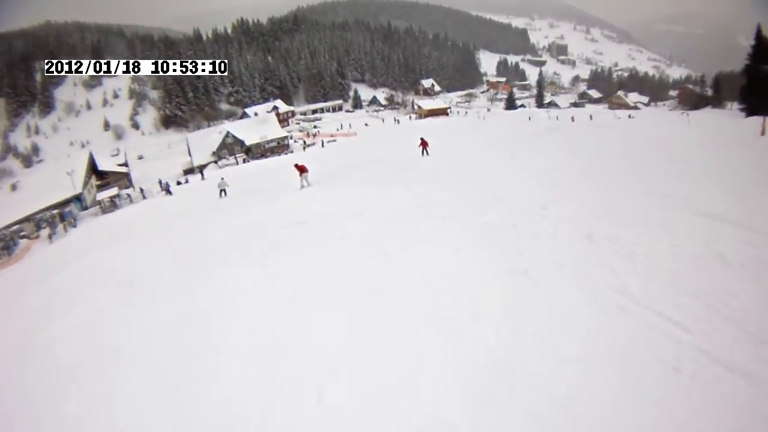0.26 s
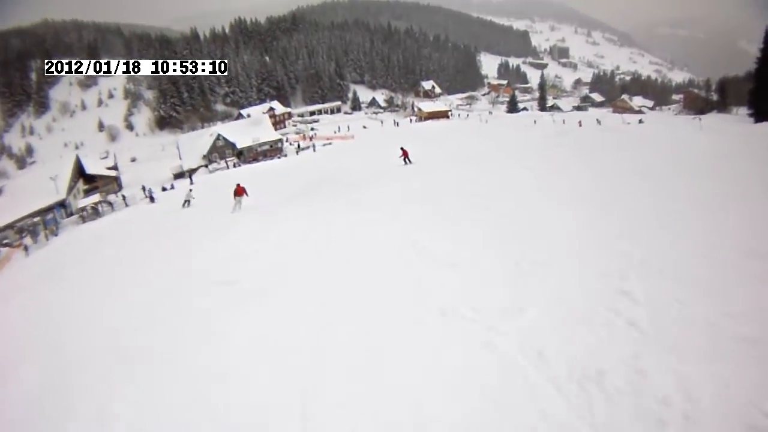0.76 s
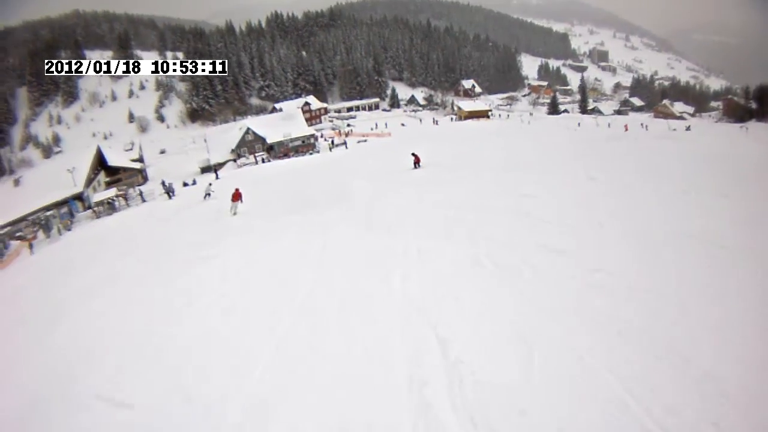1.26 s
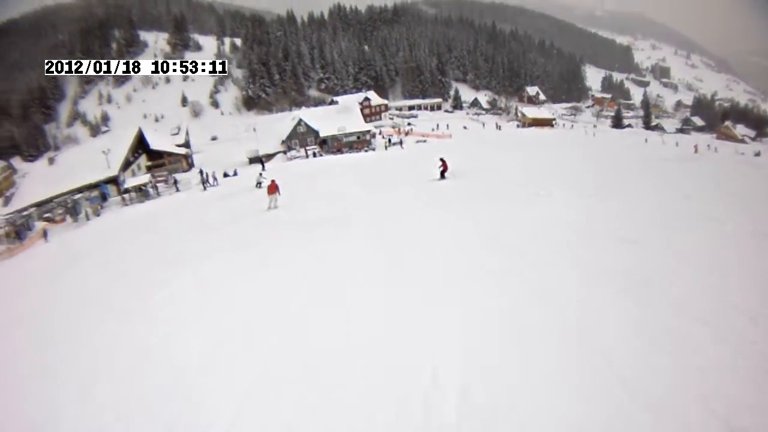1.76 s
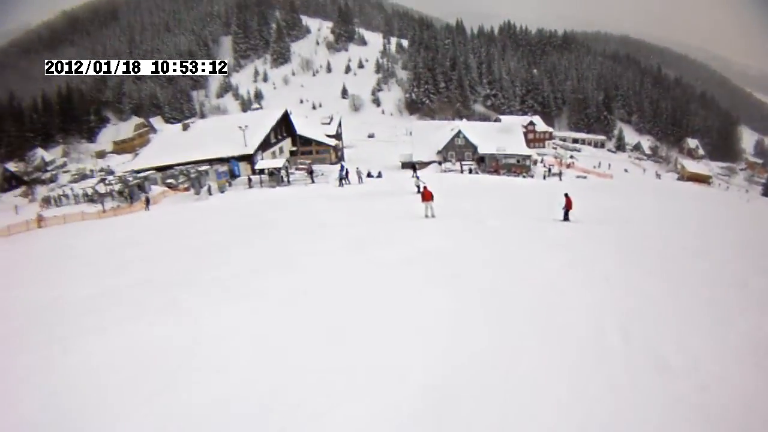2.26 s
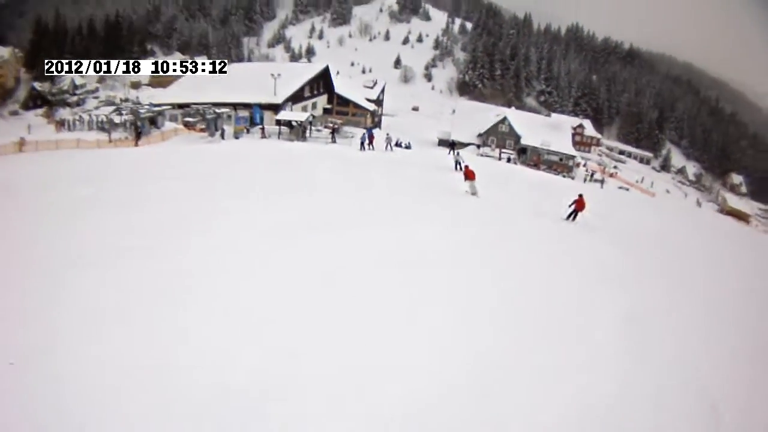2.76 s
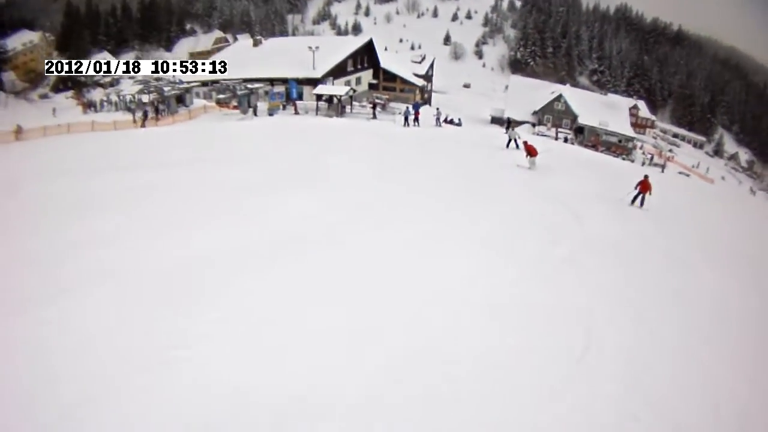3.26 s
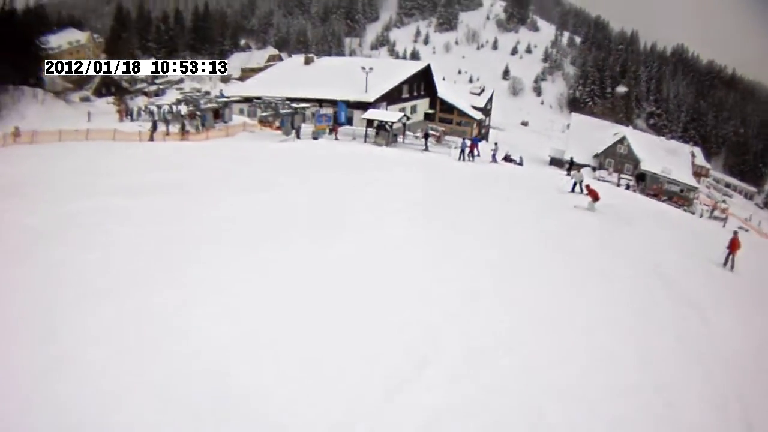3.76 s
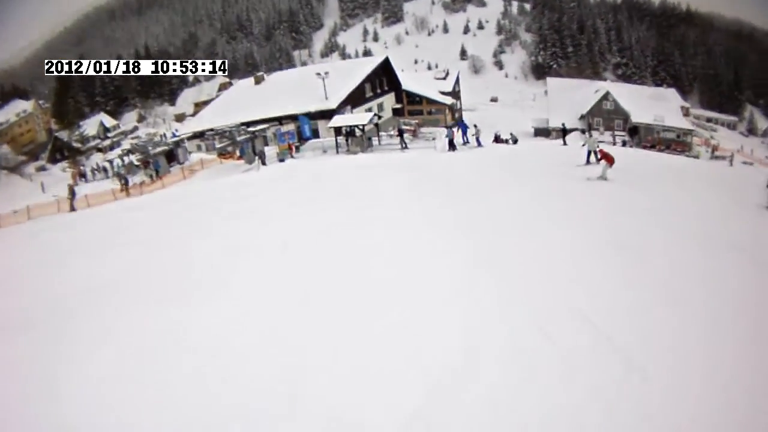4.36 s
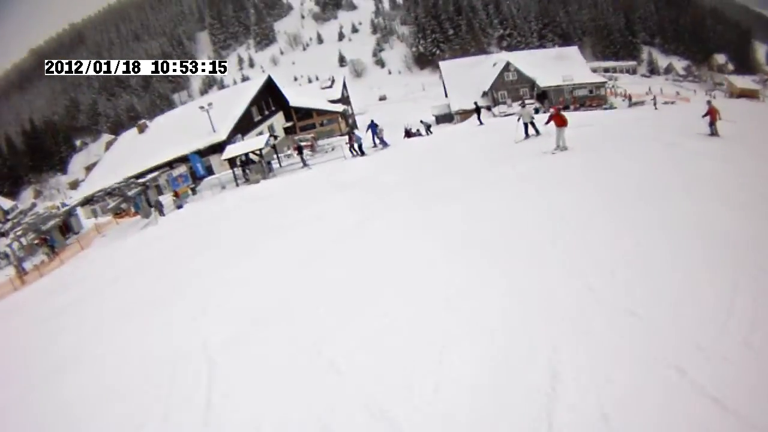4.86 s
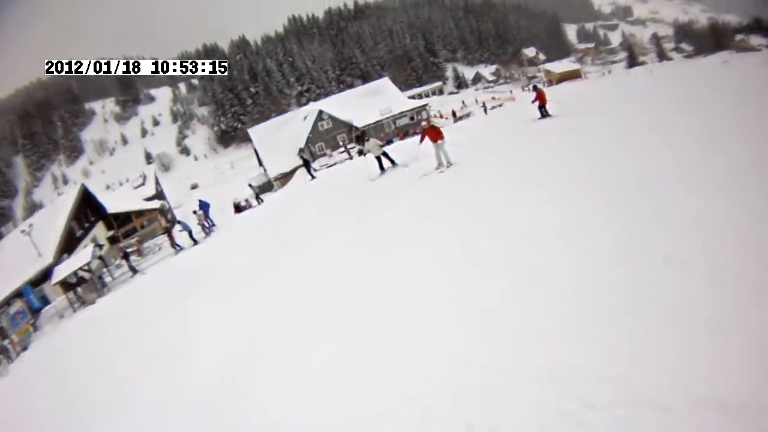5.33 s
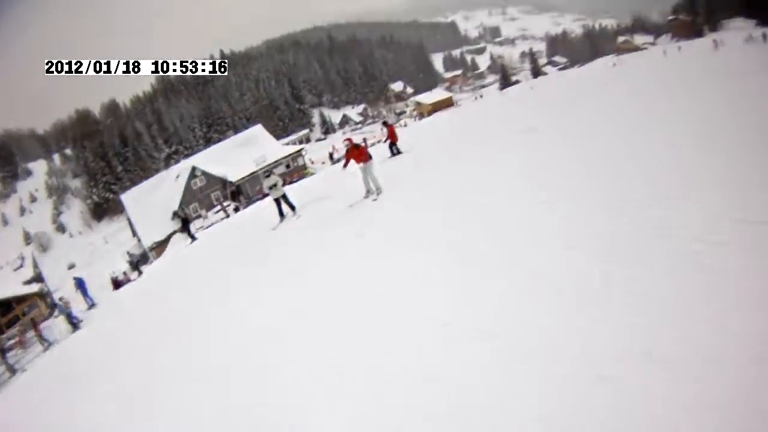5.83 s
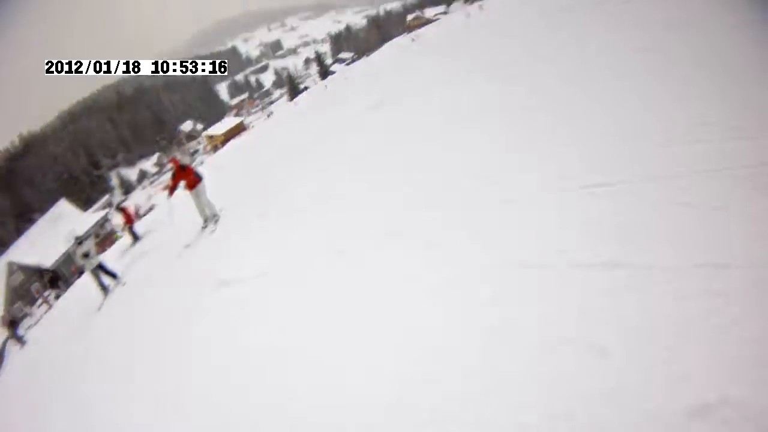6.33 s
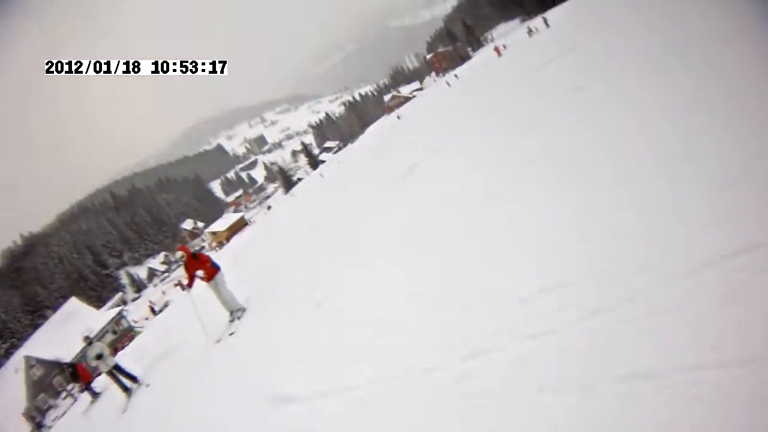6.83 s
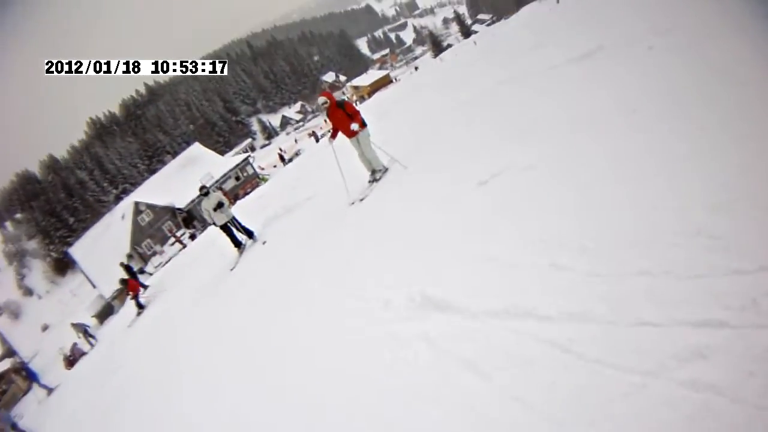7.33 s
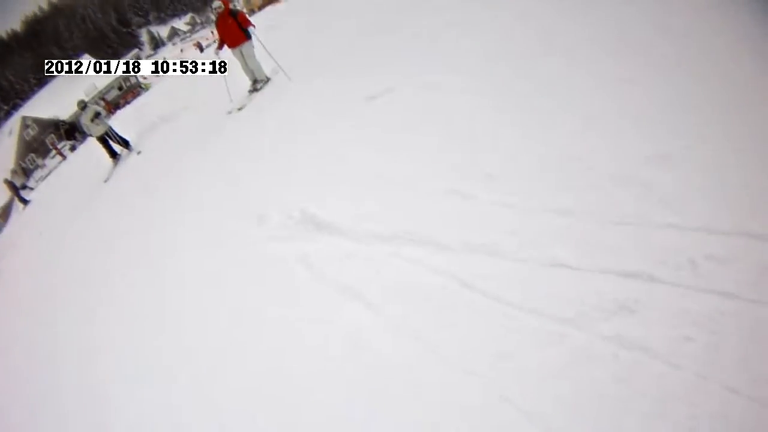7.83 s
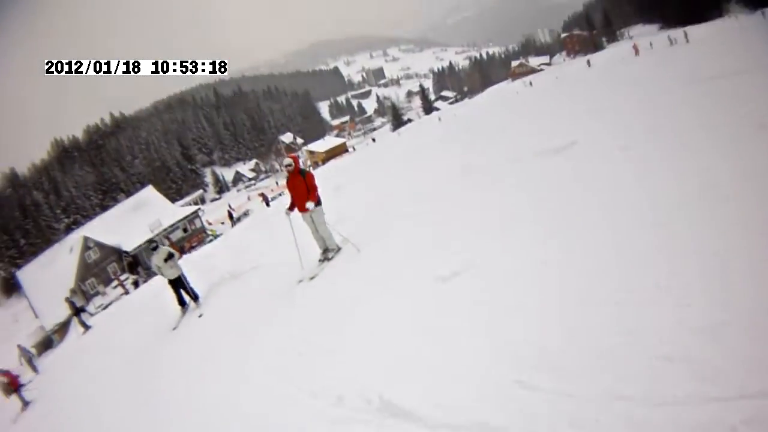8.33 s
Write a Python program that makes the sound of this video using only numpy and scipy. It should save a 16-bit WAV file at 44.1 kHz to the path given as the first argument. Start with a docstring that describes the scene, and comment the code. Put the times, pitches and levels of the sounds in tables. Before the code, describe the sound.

On an open snowy slope, heard from a small camera worn by the skier, steel edges scrape crust in a loud, bright, uneven rasp with brief dropouts and ice ticks. After three seconds it thins to a grainy crunch over a low rush. From five seconds the skis hiss softly, gear knocks lightly, a ringing skid passes, and it fades to quiet air.

```python
"""On a packed-snow slope, heard through a small camera worn by the skier, skis at body distance.
First the steel edges scrape the crust in a dense stream of breaking grains, with a ringing ski,
ice crumbs ticking on the camera case and wind noise at the microphone. The grains thin to a crunch,
over the low rush of a braking turn. From about 5 s the bases hiss softly over the snow; light gear
knocks, a ringing sideways skid and a few short brushes follow as the skier comes to a stop."""
import sys
import numpy as np
from scipy import signal
from scipy.fft import rfft, irfft
from scipy.io import wavfile

SR = 44100
rng = np.random.default_rng(int(sys.argv[2]) if len(sys.argv) > 2 else 0)


def persist_wave(psi):
    """Save psi, clipped to +-1, as 16-bit WAV."""
    counts = np.round(np.clip(psi, -1, 1) * 32767).astype(np.int16)
    wavfile.write(sys.argv[1], SR, np.atleast_2d(counts).T)


N = 378819
TIME = np.arange(N) / SR   # s


def from_db(db):
    """Decibels to amplitude gain."""
    return 10 ** (np.asarray(db) / 20)


def rms_one(x):
    """Scale to unit power."""
    return x / np.sqrt(np.mean(x ** 2) + 1e-20)


def in_time(rows):
    """Each column of a curve, interpolated at every sample."""
    s, *columns = np.transpose(rows)
    return [np.interp(TIME, s, c) for c in columns]


def drift(rate_hz):
    """Slow chance with spread 1: noise twice through a one-pole low-pass."""
    step, settle = 40, 2000   # samples per slow step; slow steps dropped while the filter settles
    r = np.exp(-2 * np.pi * rate_hz * step / SR)
    noise = rng.standard_normal(N // step + settle + 2)
    slow = signal.lfilter([1], [1, -2 * r, r * r], noise)[settle:]
    return np.interp(np.arange(N) / step, np.arange(len(slow)), rms_one(slow))


def band(x, low_hz, high_hz, order=2):
    """Butterworth band-pass."""
    edges_hz = [low_hz, min(high_hz, SR / 2 - 1)]
    return signal.sosfilt(signal.butter(order, edges_hz, "band", fs=SR, output="sos"), x)


def below(x, hz, order):
    """Butterworth low-pass run both ways, so that x minus the result is the treble."""
    return signal.sosfiltfilt(signal.butter(order, hz, fs=SR, output="sos"), x)


def resonate(x, hz, width_hz):
    """A two-pole resonance with gain 1 on top."""
    r = np.exp(-np.pi * width_hz / SR)
    zeros = np.array([1, 0, -1]) * (1 - r * r) / 2
    poles = [1, -2 * r * np.cos(2 * np.pi * hz / SR), r * r]
    return signal.lfilter(zeros, poles, x + 1e-18)


def colour(x, spectrum, size=2048):
    """Causal (minimum-phase) filter with the given spectrum, made by folding its cepstrum."""
    hz, db = np.transpose(spectrum)
    grid_hz = np.maximum(np.arange(size // 2 + 1) * SR / size, 1)
    gain = from_db(np.interp(np.log(grid_hz), np.log(hz), db))
    cepstrum = irfft(np.log(gain))
    cepstrum[1:size // 2] *= 2
    cepstrum[size // 2 + 1:] = 0
    impulse = irfft(np.exp(rfft(cepstrum)))
    return signal.fftconvolve(x, impulse)[:len(x)]


def grains(per_s, spread_db):
    """Snow grains breaking at random moments with uneven sizes; unit power at any rate."""
    chance = np.clip(per_s / SR, 1e-4, 1)   # of a grain at each sample
    sizes_db = spread_db * np.clip(rng.standard_normal(N), -2, 2)
    sizes = from_db(sizes_db) * rng.choice([-1, 1], N)
    return rms_one((rng.random(N) < chance) * sizes / np.sqrt(chance))


def bursts(events, shape, decay_s, size=4096):
    """Each event is a dying puff of noise, coloured by shape and set to its peak level."""
    out, age_s = np.zeros(N + size), np.arange(size) / SR
    for s, db in events:
        puff = shape(rng.standard_normal(size) * np.exp(-age_s / decay_s))
        start = round(s * SR)
        out[start:start + size] += from_db(db) * puff / np.abs(puff).max()
    return out[:N]


def swell(s, length_s, attack_s, release_s):
    """Rises from 0 to 1 at s, holds, and falls back once its length is over."""
    rise = np.clip((TIME - s) / attack_s, 0, 1)
    fall = np.clip(1 - (TIME - s - length_s) / release_s, 0, 1)
    return rise * fall


def with_swells(steady_db, events, attack_s, release_s):
    """Two steady levels in dB, with the power of each event added to them."""
    power = from_db(steady_db) ** 2
    for s, length_s, *db in events:
        power = power + (from_db(db)[:, None] * swell(s, length_s, attack_s, release_s)) ** 2
    return 10 * np.log10(power)


# how hard the edges bite as the run slows, before the eases: t/s, level/dB
BITE = [(0.0, -18), (0.75, -16.5), (1.15, -17.5), (1.4, -16), (1.98, -16), (2.05, -21), (2.55, -16),
        (2.7, -19), (2.93, -16), (3.1, -21.5), (3.3, -22), (3.7, -27), (4.55, -28), (4.72, -24),
        (4.95, -28.5), (4.99, -38), (5.6, -41.5)]
# the skis go light over a bump or between turns: t/s, length/s, loss of bite/dB
EASES = [(0.194, 0.29, 5.5), (0.619, 0.033, 5.5), (0.844, 0.043, 5), (0.937, 0.071, 3.5),
         (1.147, 0.0824, 2), (1.64, 0.077, 3), (2.07, 0.012, 12.5), (2.208, 0.17, 4.5),
         (2.293, 0.021, 10.5), (2.33, 0.022, 6.5), (2.36, 0.16, 3), (2.552, 0.066, 7.5), (3.307, 0.12, 6),
         (3.773, 0.175, 6), (4.018, 0.113, 13.5), (4.13, 0.061, 5), (5.166, 0.1, 8.5), (5.36, 0.036, 14.5),
         (5.415, 0.072, 14), (5.52, 0.038, 11)]


def edge_bite():
    """The bite in dB: it follows the run and drops whenever the skis go light."""
    bite_db, = in_time(BITE)
    for s, length_s, loss_db in EASES:
        # the edge lets go slowly and catches quickly
        bite_db = bite_db - loss_db * swell(s, length_s, attack_s=0.026, release_s=0.014)
    return bite_db


# colour of breaking crust: f/Hz, relative level per Hz/dB
SCRAPE_COLOUR = [(100, -34), (470, -34.5), (700, -27), (920, -18), (1900, -11.5), (2600, -3.5), (3300, 2.5),
                 (4300, -3.5), (4900, 0), (5500, -10), (6150, -28), (7600, -40), (10800, -50), (11600, -78)]


def scrape(bite_db):
    """The harder the edges bite, the more grains break each second and the brighter they sound."""
    slack_db = np.clip(-15.5 - bite_db, 0, 30)
    per_s = 8000 * from_db(-.48 * slack_db)
    chatter_db = (0.8 + 0.06 * slack_db) * drift(130)   # the skis judder over fine ridges
    crust = rms_one(grains(per_s, spread_db=6.0) + 0.31 * rng.standard_normal(N))
    sound = colour(crust, SCRAPE_COLOUR)
    case = 0.13 * resonate(sound, 3280, 130) + 0.42 * resonate(sound, 4900, 220)
    case = case + 0.78 * resonate(sound, 240, 60)
    sound = rms_one(sound + case)
    dull = below(sound, 3900, order=3)
    treble = sound - dull
    icy_db = 0.8 * drift(40) + 1.43 - 0.31 * slack_db   # icy patches tip the balance to the treble
    sound = from_db(-.5 * icy_db) * dull + from_db(2.3 * icy_db) * treble
    lift_off = np.interp(TIME, [5.52, 5.64], [1, 0])   # the edges let go as the skis run flat
    return lift_off * from_db(bite_db + chatter_db) * sound


# a ski singing along with its edge: t/s, level/dB before the ring fades out
SKI_RING = [(0.0, -49), (1.0, -48.5), (1.5, -43), (1.95, -49.5), (2.17, -39.5), (2.4, -47), (2.9, -45),
            (3.85, -51.5)]


def ski_ring():
    """Friction keeps one mode of the ski ringing while the speed is high."""
    level_db, = in_time(SKI_RING)
    fast = np.interp(TIME, [3.8, 4.1], [1, 0])
    friction = band(rng.standard_normal(N), 720, 1400)
    return fast * from_db(level_db) * rms_one(resonate(friction, 1020, 75))


def plough():
    """Loose snow pushed aside in the braking turn gives a low rush."""
    push = np.interp(TIME, [3.2, 4.1, 4.2, 4.9, 5.05], [0.56, 0.59, 0.68, 0.81, 0.02])
    rush = band(rng.standard_normal(N), 572, 2200, order=7)
    return push * from_db(-46.5) * rms_one(rush + 0.24 * resonate(rush, 620, 140))


# bases gliding on loose snow, before trims: t/s, low rush level/dB, bright hiss level/dB
GLIDE = [(5.65, -51.5, -48), (5.8, -54, -52.5), (6.02, -52.5, -49.5), (6.2, -57.5, -55.5),
         (6.52, -57.5, -52), (6.85, -55, -41.5), (7.08, -61, -49.5), (7.24, -59, -51), (7.44, -71, -68.5),
         (8.59, -74.5, -79)]
# short brushes of a ski shifting on the snow, before trims:
# t/s, length/s, low rush level/dB, bright hiss level/dB
BRUSHES = [(6.587, 0.018, -53, -41.5), (7.122, 0.056, -60, -47), (7.631, 0.15, -64, -74),
           (7.852, 0.26, -70, -64), (8.166, 0.07, -66.5, -82), (8.435, 0.083, -64.5, -60.5)]
# colour of the gliding snow: f/Hz, relative level per Hz/dB
GLIDE_COLOUR = [(150, -11), (300, -10), (500, -9.5), (1000, -0.5), (1500, -0.5), (2000, -6), (3400, 3.5),
                (4200, -0.5), (5200, 6), (6200, -7.5), (7200, -10), (8500, -19), (10800, -18), (11600, -43)]
# resonances of the camera case: f/Hz, width/Hz, mean lift/dB
CASE = [(1630, 180, 5.5), (2680, 110, 8.5), (3220, 220, 5), (5130, 390, 0), (7900, 130, -6)]


def glide():
    """Finely grained friction of the bases gives a soft rush and hiss, coloured by the case."""
    rush_db, hiss_db = with_swells(in_time(GLIDE), BRUSHES, attack_s=0.01, release_s=0.061)
    per_s = 9000 * from_db(2.7 * drift(15))
    bare = colour(grains(per_s, spread_db=6.0), GLIDE_COLOUR)
    snow = bare
    for hz, width_hz, lift_db in CASE:
        lift = from_db(lift_db + 2.2 * drift(10.0)) - 1
        snow = snow + lift * resonate(bare, hz, width_hz)
    rush = below(snow, 2050, order=4)
    hiss = snow - rush
    flat = np.interp(TIME, [5.52, 5.62], [.3, 1])   # share of the treble that comes from the flat bases
    # each level is set by the power in the middle of its band
    rush = from_db(rush_db - 0.3) * rush / np.std(band(rush, 700, 1650))
    hiss = flat * from_db(hiss_db - 1.8) * hiss / np.std(band(hiss, 2500, 5660))
    onset = np.interp(TIME, [4.7, 5.0], [0.039, 1])
    return onset * from_db(1.0 * drift(45)) * (rush + hiss)


# modes of a ski skidding sideways in the stop: f/Hz, width/Hz, mean relative level/dB
SKID_MODES = [(770, 92, -4.5), (1180, 130, 1), (1640, 120, -9.5), (2240, 150, -4.5), (2620, 130, -2.5),
              (4730, 140, 0)]


def skid():
    """Turned across the slope for the stop, the skis are rubbed into ringing; faint before that."""
    sideways = np.interp(TIME, [6.2, 6.6, 6.85, 7.2, 7.38], [0.18, 0.39, 1, 0.87, 0.08])
    rub = grains(4000, spread_db=8.0)
    ringing = 0
    for hz, width_hz, db in SKID_MODES:
        mode = resonate(resonate(rub, hz, width_hz), hz, width_hz)
        ringing = ringing + from_db(db + 1.8 * drift(6)) * mode
    return sideways * from_db(-50) * rms_one(ringing)


# light knocks of skis and bindings: t/s, peak level/dB before a common trim
KNOCKS = [(5.4094, -38), (5.462, -45), (5.733, -27), (5.819, -32), (6.0327, -40), (6.469, -33)]
# modes of the knocked gear: f/Hz, relative level/dB, time to fall 60 dB/s
KNOCK_MODES = [(1090, -12, .03), (1360, 6, 0.027), (1510, 6, 0.016), (1720, -7, .025), (2730, -16, .02),
               (3330, -10, .015)]


def knocks():
    """Skis and bindings rap dully on bumps, ringing in short modes; one jolt thumps the camera mount."""
    def gear(x):
        """Sum of the modes, each with the bandwidth that gives its decay."""
        x = band(x, 800, 3500)
        return sum(from_db(db) * resonate(x, hz, np.log(1000) / (np.pi * t60_s))
                   for hz, db, t60_s in KNOCK_MODES)

    raps = bursts(KNOCKS, gear, decay_s=0.0034)
    thump = bursts([(3.950, -45)], lambda x: band(x, 110, 430), decay_s=0.0081)   # t/s, peak/dB
    return from_db(-2.5) * raps + thump


# single lumps of crust giving way: t/s, peak level/dB before a common trim
CRUNCHES = [(2.0892, 0), (2.36, -7.5), (4.1395, -17), (4.2088, -9.5), (5.0454, -23), (5.1674, -17.5),
            (5.4106, -35), (5.4964, -26), (5.5737, -31), (5.914, -33), (6.6727, -26), (7.859, -36)]


def crunches():
    """Lumps of crust collapse, each a short burst of noise in the colour of the crust."""
    lumps = bursts(CRUNCHES, lambda x: band(colour(x, SCRAPE_COLOUR), 930, 8000), decay_s=0.0059)
    return from_db(-5.5) * lumps


# the bigger ice crumbs hitting the case: t/s, peak level/dB
CRUMBS = [(0.1424, -26), (0.8071, -22), (1.6184, -25), (1.86, -23), (1.9542, -20), (2.8978, -24),
          (2.9736, -21), (3.039, -23.5), (3.815, -25), (3.95, -18.5), (4.0894, -37), (4.109, -34),
                   (5.245, -34), (5.3093, -38), (5.575, -27.5), (5.7166, -33), (5.946, -33.5),
          (7.0232, -28.5)]
# colour of ice on the case: f/Hz, relative level per Hz/dB
CRUMB_COLOUR = [(500, -33.5), (3000, -14), (5500, -0.5), (7000, -1.5), (8500, -8), (10800, -3),
                (11500, -37)]


def crumbs(bite_db):
    """Ice ticks on the case: a few big crumbs, and a fine spray whose level also follows the bite."""
    big = bursts(CRUMBS, lambda x: colour(x, CRUMB_COLOUR), decay_s=0.0011)
    spray = rms_one(colour(grains(per_s=90, spread_db=7.0), CRUMB_COLOUR))
    # the spray dips around 4.3 s, recovers, and dies down towards the stop
    spray_db = np.interp(TIME, [3.4, 4.3, 6.3, 7.4], [0.5, -8.0, -0.5, -19.5])
    return big + from_db(-55 + spray_db + 0.18 * bite_db) * spray


# steady airflow over the microphone: t/s, reference level/dB
AIRFLOW = [(0.0, -65.5), (2.0, -63), (2.8, -51.5), (3.5, -60), (4.1, -68), (6.8, -69), (8.59, -75.5)]
# gusts: t/s, length/s, slow buffet level/dB, rumble level/dB
GUSTS = [(2.097, 0.14, -65, -53), (2.558, 0.11, -44, -53), (3.763, 0.13, -55, -75),
         (5.356, 0.084, -52, -63), (5.617, 0.16, -47, -75), (5.892, 0.25, -54, -83), (6.66, 0.13, -53, -73)]
# still air over the slope, with microphone hiss: f/Hz, relative level per Hz/dB
AIR = [(60, -0.5), (160, -8.5), (250, -0.5), (360, 0.5), (470, -6.5), (1000, 2), (2100, -4), (5000, -4.5),
       (6500, -13), (10800, -11.5), (11600, -42)]


def wind():
    """Slow buffets and a lumpy rumble of eddies at the microphone port, over still air."""
    flow_db, = in_time(AIRFLOW)
    steady_db = [flow_db + 4.0, flow_db - 1.5]   # buffets, rumble
    buffet_db, rumble_db = with_swells(steady_db, GUSTS, attack_s=0.017, release_s=0.071)
    buffets = from_db(buffet_db) * rms_one(band(rng.standard_normal(N), 6.4, 32, order=3))
    low_eddies = rms_one(band(rng.standard_normal(N), 36, 100))
    high_eddies = rms_one(band(rng.standard_normal(N), 130, 420))
    eddies = low_eddies + from_db(-4.0) * high_eddies
    rumble = from_db(rumble_db + 1.8 * drift(11.3)) * eddies
    air = from_db(-66.5) * rms_one(colour(rng.standard_normal(N), AIR))
    return buffets + rumble + air


def scene():
    """Skis, snow and wind heard from the skier's body."""
    bite_db = edge_bite()
    skis = scrape(bite_db) + ski_ring() + plough() + glide() + skid() + knocks() + crunches()
    return (skis + crumbs(bite_db) + wind())[None]


def record(dry):
    """The camera's microphone channel: the highest peaks are clipped and the top is cut."""
    clipped = np.clip(dry, -.74, .74)
    top_cut = signal.ellip(10, .1, 80, 15800, fs=SR, output="sos")   # low-pass, Hz
    return signal.sosfilt(top_cut, clipped)


dry = scene()
out = record(dry)
persist_wave(out)
```